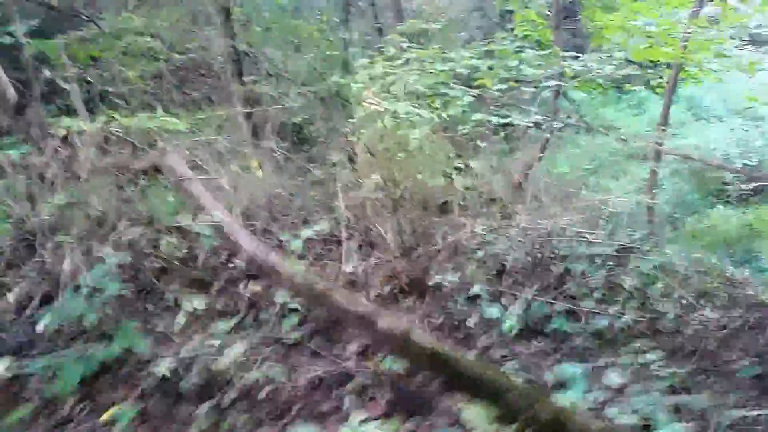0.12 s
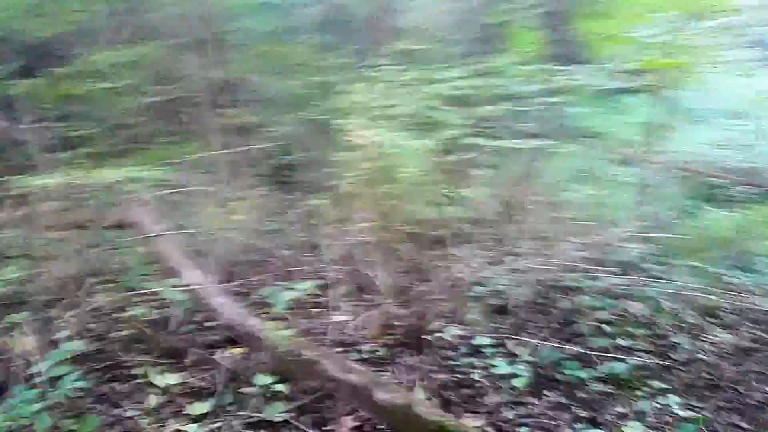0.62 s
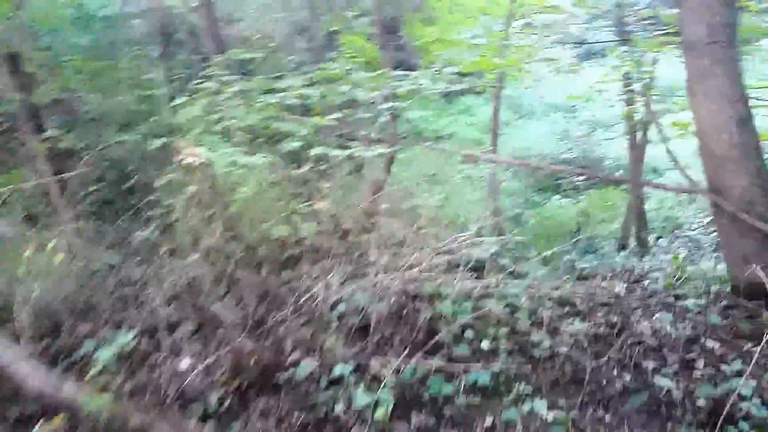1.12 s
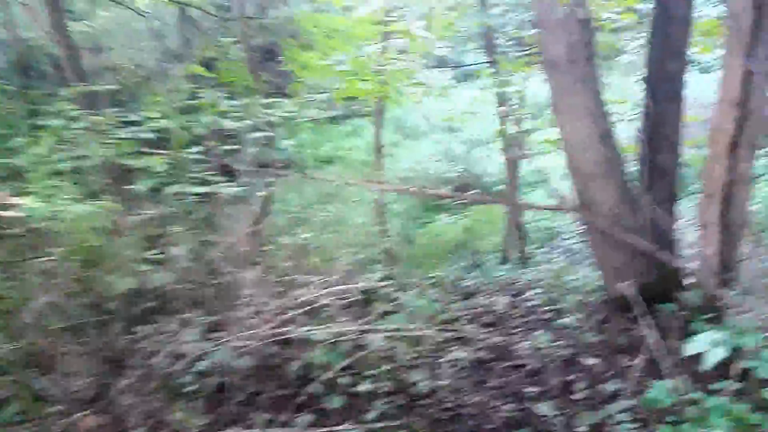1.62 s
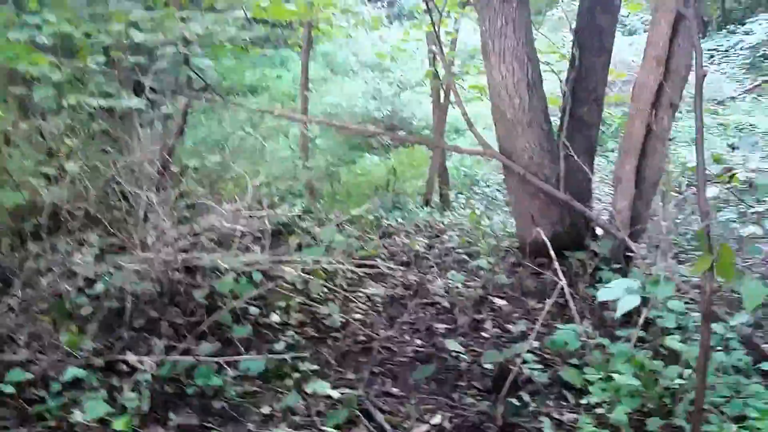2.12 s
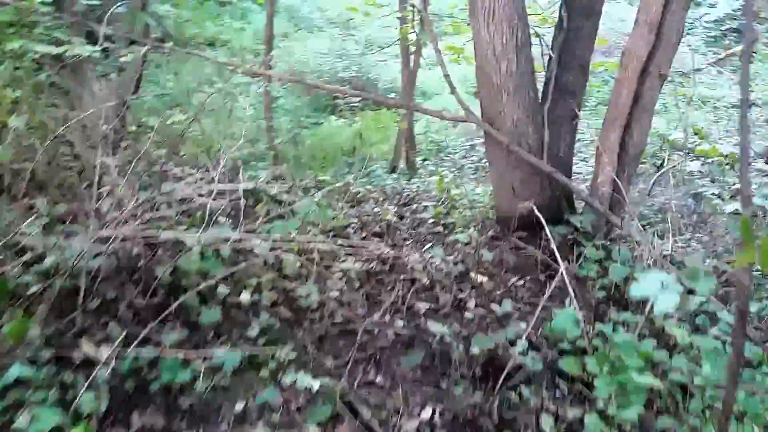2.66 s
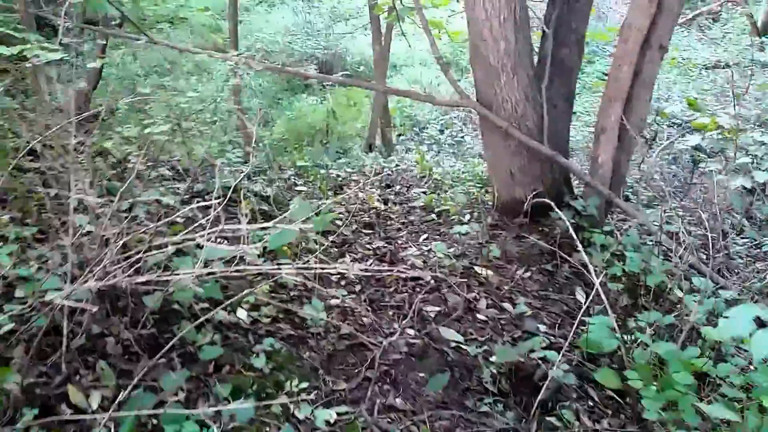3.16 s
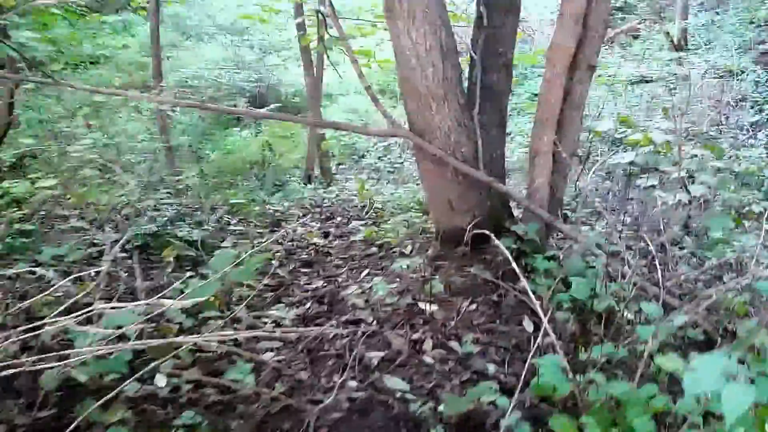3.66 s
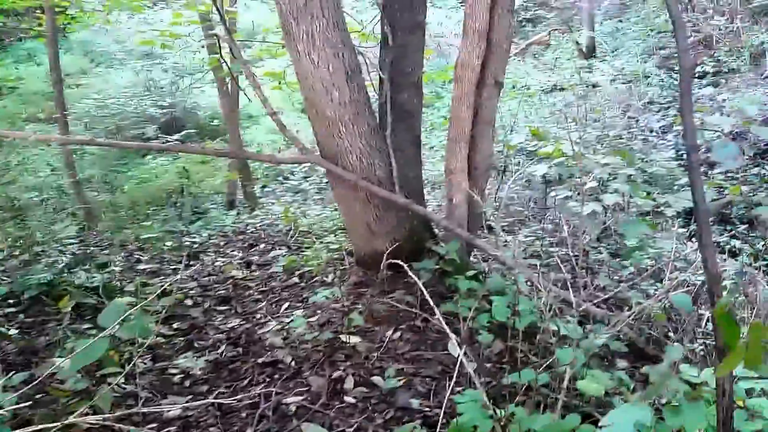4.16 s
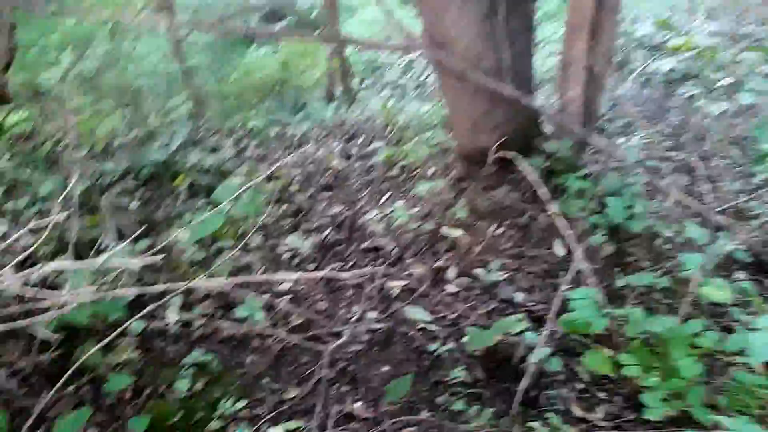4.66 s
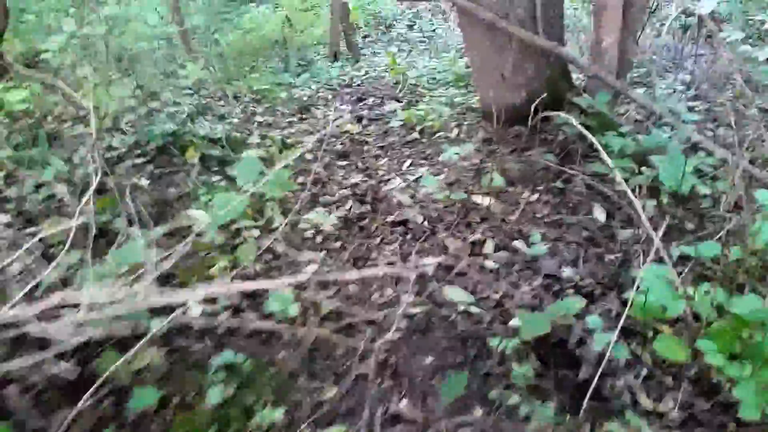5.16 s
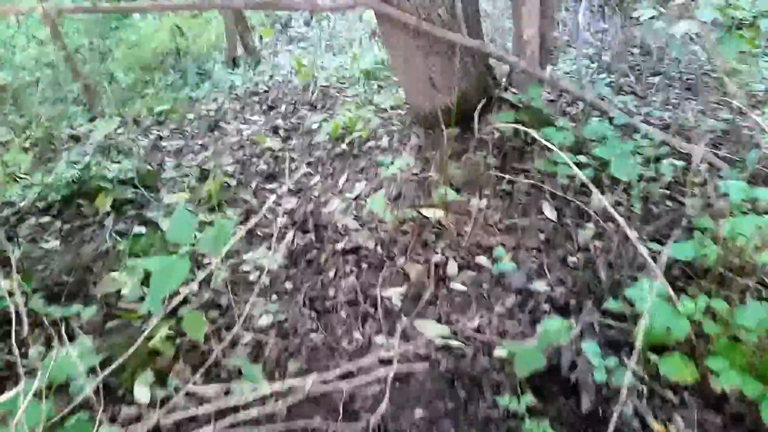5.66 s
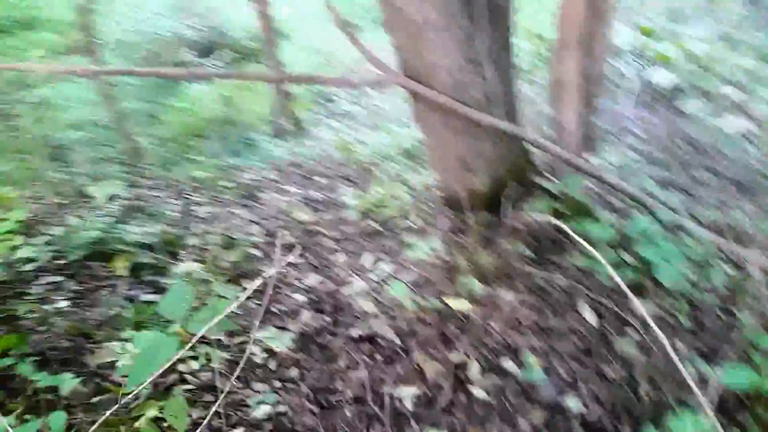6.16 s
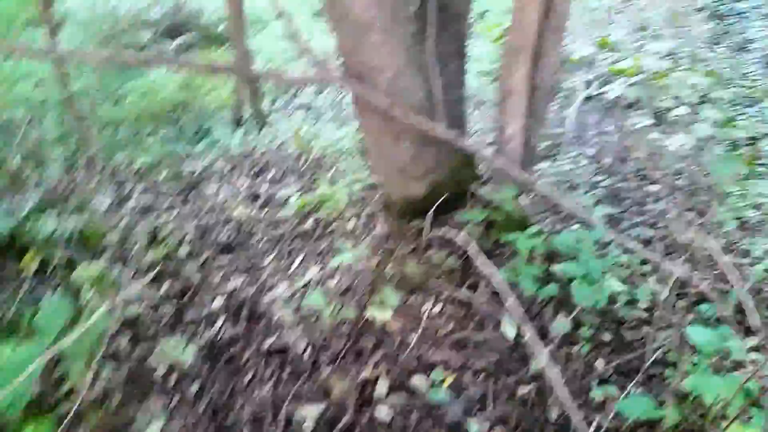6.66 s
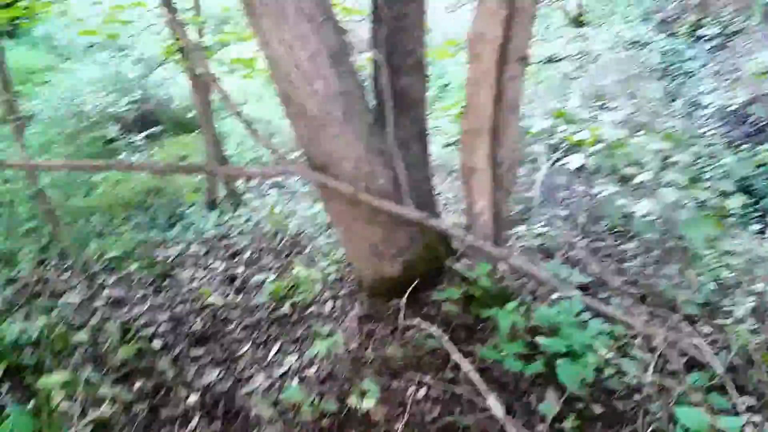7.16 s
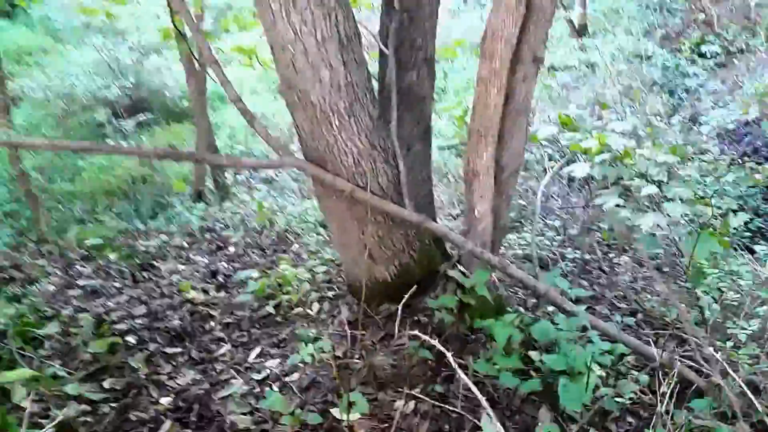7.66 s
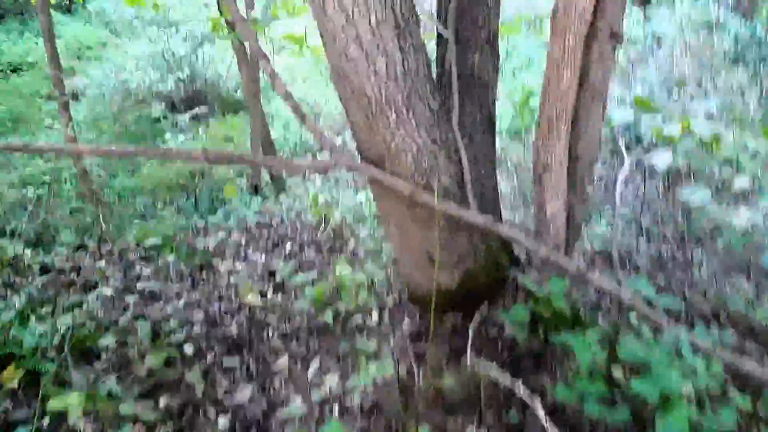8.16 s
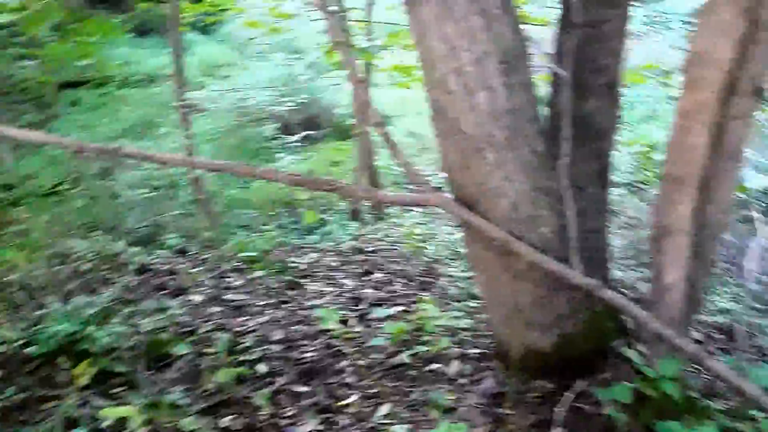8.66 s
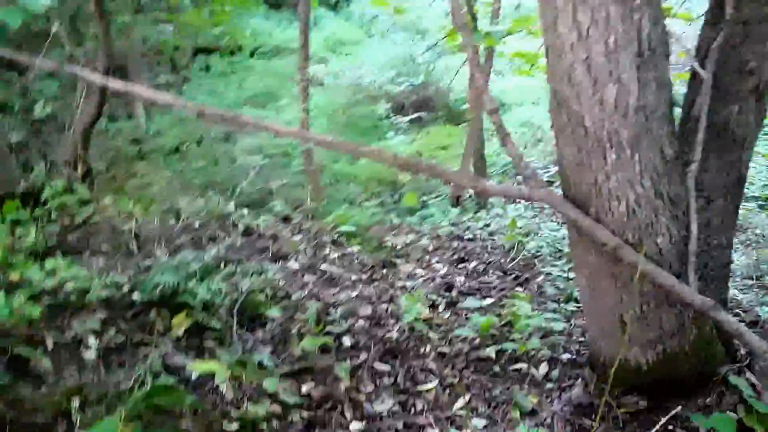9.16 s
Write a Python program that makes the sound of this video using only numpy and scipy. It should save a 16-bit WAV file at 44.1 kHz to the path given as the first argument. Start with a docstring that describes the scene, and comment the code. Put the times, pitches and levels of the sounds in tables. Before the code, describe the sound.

Woodland insects trill in a steady high chorus while twigs snap, leaves rustle and soft thumps knock close to the microphone, then a last burst of cracks.

```python
"""Twigs snap and fingers tap close to a small two-microphone recorder carried slowly through a wood of insects.
Clicks ring its ports and body; knocks swing the diaphragm, a finger rubs, leaves rustle in tiny cracks.
A near cricket's falling wing strokes stop early; a far chorus of trilling noise bands hisses on the left.
The left port favours 4-6 kHz, the right one 14 kHz; a low noise of the air lies under it all."""
import sys
import numpy as np
from scipy import signal
from scipy.fft import rfft, irfft, next_fast_len
from scipy.io import wavfile

SR = 44100
rng = np.random.default_rng(int(sys.argv[2]) if len(sys.argv) > 2 else 0)


def volts_from_db(level):
    """Convert decibel levels to linear amplitude ratios."""
    exponent = np.asarray(level, float) / 20
    return 10 ** exponent


def store_wav(level_fs):
    """Save 16-bit WAV to argv[1]."""
    pcm = np.round(np.clip(np.atleast_2d(level_fs), -1, 1) * 32767)
    wavfile.write(sys.argv[1], SR, pcm.T.astype(np.int16))


N = 410126
TIME_S = np.arange(N) / SR


def unit(x):
    """Scale so that the mean of the channels has rms 1."""
    return x / np.sqrt(np.mean(np.mean(np.atleast_2d(x), axis=0) ** 2) + 1e-24)


def in_time(rows):
    """Columns of a table as curves, one value a sample."""
    s, *columns = np.transpose(rows)
    return [np.interp(TIME_S, s, column) for column in columns]


def colour(x, spectrum, low_hz=0, high_hz=SR):
    """Give each channel its spectrum; the mean of both has rms 1 between low_hz and high_hz."""
    size = next_fast_len(N)
    hz = np.arange(size // 2 + 1) * SR / size + 1e-3   # the offset keeps the logarithm finite
    at, left, right = np.transpose(spectrum)
    gain_db = [np.interp(np.log(hz), np.log(at), side, left=-120, right=-120) for side in (left, right)]
    shaped = rfft(x, size) * volts_from_db(gain_db)
    inside = (hz > low_hz) & (hz < high_hz)
    power = 2 * np.sum(abs(shaped.mean(axis=0)[inside]) ** 2) / size / N
    return irfft(shaped, size)[:, :N] / np.sqrt(power)


def drift(rate_hz):
    """Slow chance of spread 1: noise through two equal low-pass poles, drawn every 40 samples."""
    r = np.exp(-80 * np.pi * rate_hz / SR)
    slow = signal.lfilter([1], [1, -2 * r, r * r], rng.standard_normal(N // 40 + 2002))[2000:]
    return np.interp(np.arange(N) / 40, np.arange(len(slow)), slow / slow.std())


def pair(alike):
    """Two white noises that share a part."""
    mid, side = rng.standard_normal((2, N))
    alike = np.clip(alike, 0, 1)
    return np.sqrt(1 + alike) * mid + np.sqrt(1 - alike) * side * [[1], [-1]]


def click_train(times, db):
    """One sample a click."""
    clicks = np.full(N, 1e-18)
    clicks[(np.asarray(times) * SR).astype(int)] = volts_from_db(db)
    return clicks


def ring(clicks, modes):
    """Clicks set every mode ringing as a decaying sine; neighbouring modes start with opposite signs."""
    out = 0
    for k, (hz, db, t60) in enumerate(modes):
        r = volts_from_db(-60 / (t60 * SR))
        w = 2 * np.pi * hz / SR
        strike = (-1) ** k * volts_from_db(db) * np.sin(w)
        out = out + signal.lfilter([0, strike], [1, -2 * r * np.cos(w), r * r], clicks)
    return out


def swells(s, levels_db, rise_s, fall_s):
    """Each row swells to its levels and dies away; overlapping rows add in power. One dB curve per level."""
    t = np.arange(0, N / SR, .001)
    late = t - np.array(s)[:, None]
    loss_db = 20 * np.maximum(-late / np.array(rise_s)[:, None], late / np.array(fall_s)[:, None])
    curves = []
    for db in levels_db:
        power = np.sum(volts_from_db(2 * (db[:, None] - loss_db)), axis=0)
        curves.append(np.interp(TIME_S, t, 10 * np.log10(power + 1e-12)))
    return curves


TICKS_PER_S = 30   # small ticks scattered through the rustle
# above the swish, per level column of a snap; full width of the chance about it
TICK_DB, TICK_RANGE_DB = (14, 15, 10, 8), 16


def ticks(swish_db):
    """Small snaps at random moments, stronger where the rustle around them is stronger."""
    chance = rng.random((int(TICKS_PER_S * N / SR), 5))
    s = chance[:, 0] * (N - 1) / SR
    crisp_db, mids_db, dull_db = swish_db[:, (s * SR).astype(int)]
    around_db = np.transpose([crisp_db, mids_db, dull_db, dull_db])
    db = around_db + TICK_DB + TICK_RANGE_DB * (chance[:, 1:] - .5)
    return np.column_stack([s, db])


# the clearest snaps, and taps on the casing, close to the microphones:
# (time [s], right port treble peak [dB], left port mids peak [dB],
# relative body level left [dB], relative body level right [dB])
SNAPS_AND_TAPS = [(0.0174, -36, -46, -60, -66), (0.0576, -38, -42, -69, -64), (0.079, -28, -48, -62, -65),
                  (0.1264, -22.5, -46, -53, -49), (0.1696, -33.5, -48, -61, -61),
                  (0.2666, -24, -25, -43, -52), (0.2813, -20, -40, -56, -57), (0.2871, -21, -34, -53, -57),
                  (0.294, -17, -42, -44, -61), (0.2992, -23, -45, -45, -61), (0.3196, -32, -40, -42, -34),
                  (0.3292, -25, -42, -24, -30), (0.336, -22, -43, -50, -51), (0.3433, -30, -42, -24, -43),
                  (0.353, -25.5, -43, -57, -58), (0.4589, -39, -51, -44, -34),
                  (0.5724, -43, -19, -8.5, -31), (0.585, -20, -42, -36, -19),
                  (0.6204, -40.5, -27, -28, -32), (0.6344, -46, -25, -19.5, -44),
                  (0.7954, -43.5, -20, -19, -40), (0.8026, -43.5, -24, -26, -33),
                  (0.813, -50, -22, -14, -32), (1.1321, -53, -75, -15, -39), (1.336, -36.5, -31, -36, -43),
                  (1.414, -37, -38, -27.5, -30), (1.4393, -13, -15, -26.5, -29),
                  (1.5871, -38, -34, -58.5, -65), (2.8932, -45, -34, -43, -49),
                  (3.1286, -53, -27.5, -59, -62), (3.3761, -58, -39, -46.5, -47),
                  (3.6412, -36, -30.5, -55, -52), (3.8488, -34, -35, -55, -63),
                  (3.8627, -33, -45, -64, -62), (3.9135, -34, -35, -50, -53),
                  (3.9303, -30.5, -38, -64, -62), (4.3162, -61, -72, -17, -32),
                  (4.4051, -63, -40.5, -43.5, -51), (5.1215, -56, -40.5, -48, -54),
                  (5.3607, -49, -37, -55, -51.5), (5.4178, -54, -31.5, -55, -73),
                  (5.5773, -55, -37, -58, -63), (5.7232, -52, -39, -50, -50.5),
                  (5.8888, -41, -60, -34, -37), (5.897, -54, -45, -40, -42), (6.0274, -60, -39, -45, -47),
                  (6.192, -47, -31, -51, -51), (6.2448, -49, -41, -50, -50),
                  (6.3955, -30, -31.5, -48.5, -47), (7.1835, -40, -49, -69, -73.5),
                  (7.6307, -43, -36, -60, -63.5), (7.7937, -49, -47, -47.5, -56),
                  (8.1027, -41, -51, -63, -58), (8.254, -54, -51, -41, -44), (8.4327, -32, -46, -46, -57),
                  (8.5098, -32, -31, -41, -39), (8.5426, -40, -27, -43, -41),
                  (8.5507, -26.5, -21, -30, -31), (8.5702, -23, -26, -28, -28), (8.597, -16, -21, -29, -29),
                  (8.6152, -7, -18, -20.5, -21), (8.6222, -24, -39, -37, -35),
                  (8.6741, -16, -16.5, -19.5, -21.5), (8.6884, -30, -22, -49, -48),
                  (8.7498, -8, -24.5, -27, -27), (8.7992, -38, -29.5, -48, -47),
                  (8.8279, -38, -34, -32.5, -33.5), (8.8404, -49, -50, -44, -45),
                  (8.8998, -48, -46, -48, -47), (8.9185, -33, -36, -62, -59)]
# what a snap or tap rings in either port and in the body: (frequency [Hz], relative level [dB], t60 [s])
RIGHT_PORT_TREBLE = [(12300, -5, 0.0019), (14444, 10, 0.002), (14620, 9, 0.0017)]
RIGHT_PORT_MIDS = [(3030, -7.5, 0.0038), (4460, -9, 0.0033), (6200, -9, 0.0026)]
LEFT_PORT_TREBLE = [(10800, -1.5, 0.0016), (13300, -1, .003), (15100, -15, .003)]
LEFT_PORT_MIDS = [(3510, 2, 0.002), (4260, 3.5, 0.0045), (5190, 8, 0.0038), (6530, 6, 0.0036)]
BODY_MODES = [(470, -2.5, 0.012), (768, -0.5, 0.0083), (1240, -1.5, 0.0057), (2630, -12, 0.0019)]
# mids this far under the body mark a fingertip tap, which is dull
SOFT_BELOW_DB, SOFT_CUT_HZ = -33, 1300


def snaps_and_taps(swish_db, treble_leak_db=-15, mids_leak_db=-22, splinter_db=-27, splinter_s=0.023,
                   softness=0.05):
    """A click rings ports and body; a crackle follows it and dies by 60 dB in splinter_s; taps are dull."""
    s, treble_db, mids_db, left_db, right_db = np.transpose([*SNAPS_AND_TAPS, *ticks(swish_db)])
    fade = volts_from_db(-60 / (splinter_s * SR))
    crackle = volts_from_db(splinter_db) * rng.standard_normal((2, N)) * volts_from_db(3 * drift(300))

    def port(db, ear, modes, edges_hz):
        """The click through one port resonance; a lone click peaks at its own height."""
        cut = signal.butter(4, edges_hz, "band", fs=SR, output="sos")
        clicks = click_train(s, db)
        burst = clicks + signal.lfilter([0, 1], [1, -fade], clicks) * crackle[ear]
        height = abs(signal.sosfilt(cut, ring(np.eye(1, 400)[0], modes))).max()
        return signal.sosfilt(cut, ring(burst, modes)) / height

    left = port(treble_db + treble_leak_db, 0, LEFT_PORT_TREBLE, [9000, 16500])
    left = left + port(mids_db, 0, LEFT_PORT_MIDS, [2000, 8500])
    right = port(treble_db, 1, RIGHT_PORT_TREBLE, [10500, 16500])
    right = right + port(mids_db + mids_leak_db, 1, RIGHT_PORT_MIDS, [2000, 8500])
    # a blow poor in mids is a soft contact and leaves the upper body modes quiet; each blow lands elsewhere
    tilt_db = softness * np.clip(mids_db - left_db, -45, 10)
    spot_db = rng.normal(0, 2, (len(s), len(BODY_MODES)))

    def struck(kind, side_db):
        """The body modes rung by one kind of blow."""
        out = 0
        for k, mode in enumerate(BODY_MODES):
            blow_db = side_db - 6.5 + k * k * tilt_db + spot_db[:, k]
            out = out + ring(click_train(s[kind], blow_db[kind]), [mode])
        return out

    soft = mids_db - left_db < SOFT_BELOW_DB
    hard = np.array([struck(~soft, db) for db in (left_db, right_db)])
    tap = np.array([struck(soft, db) for db in (left_db, right_db)])
    dull = signal.butter(4, SOFT_CUT_HZ, fs=SR, output="sos")
    body = hard + signal.sosfilt(dull, tap)
    return np.array([left, right]) - signal.lfilter([.3], [1, -.7], body)


# knocks on casing and ground, at the microphones:
# (time [s], left push level [dB], right push level [dB], mean push frequency [Hz], swings [count])
KNOCK_BLOWS = [(.319, -24, -39, 60, 2.15), (0.342, -30, -44, 150, 0.79), (.42, -28, -43, 50, 0.81),
               (.454, -27.5, -40, 226, 1.05), (0.554, -17.5, -41, 169, 0.89), (.572, -24, -47, 200, 1.3),
               (0.585, -45, -24, 110, 0.96), (0.6163, -14.5, -39, 132, 1.7), (0.667, -27, -43, 130, 0.99),
               (0.803, -5, -34, 87.6, 1.16), (0.8141, -9.5, -36, 71.9, 0.88),
               (1.1315, -23.5, -29, 259, 1.04), (1.441, -47, -46, 131, 1.3), (1.962, -41, -70, 123, 2.2),
               (2.007, -38, -68, 124, 1.14), (4.3152, -27, -37, 273.5, 1.1), (5.888, -40, -41, 148, 1.24),
               (5.898, -46, -44, 93, 3.6), (6.27, -51, -48, 100, 1.5), (8.573, -38, -37, 122, 1),
               (8.617, -48, -48, 150, 1.5), (8.671, -40, -39, 250, 1.1), (8.752, -45, -41.5, 133, 2.2)]
# the casing's hum: (frequency [Hz], relative level [dB], t60 [s])
CASING_MODES = [(250, -4, 0.5), (138, 3, .05), (460, 3, 0.03)]
REBOUND_S = .02   # a knock this soon after another pushes the other way


def knocks(slowing=0.92, skew=0.44, hum_db=-11, sharp=1.3):
    """A soft push swings the diaphragm, ever slower; knocks stronger on the left set the casing humming."""
    out, direction, last_s = np.zeros((2, N)), 1, -1
    for s, left_db, right_db, hz, swings in KNOCK_BLOWS:
        direction = -direction if s - last_s < REBOUND_S else 1
        last_s = s
        u = np.linspace(0, 1, int(swings * SR / hz))
        envelope = np.sin(np.pi * u ** skew) ** .5
        push = direction * np.sin(2 * np.pi * swings * u ** slowing) * envelope
        at = round(s * SR)
        out[:, at:at + len(push)] += push / abs(push).max() * volts_from_db(np.array([[left_db], [right_db]]))
    s, left_db, right_db, hz = np.transpose([k[:4] for k in KNOCK_BLOWS if k[1] > k[2] + 3])
    sharp_db = sharp * 20 * np.log10(hz / CASING_MODES[0][0])   # quicker pushes hum more
    hum = ring(click_train(s + 1 / hz, left_db + hum_db + sharp_db), CASING_MODES)
    pushes = signal.sosfilt(signal.butter(2, SOFT_CUT_HZ, fs=SR, output="sos"), out)
    return pushes + hum * volts_from_db(np.array([[0], [-20.5]]))


# a finger slips by the left port, touching the recorder:
# (time [s], low drag level [dB], hiss level [dB], time to rise by 20 dB [s], time to die by 20 dB [s])
FINGER_RUBS = [(.2, -63.5, -88, 0.4, 0.7), (.33, -46, -58, 0.03, 0.11), (0.459, -45.5, -56, 0.09, 0.06),
               (.585, -52, -41, 0.06, 0.08), (.63, -32.5, -44, 0.0473, 0.07), (0.691, -44, -52, 0.12, 0.05),
               (.75, -49, -75, 0.02, 0.09), (.797, -38, -28, .002, .025), (.805, -37, -25, .012, .013),
               (.813, -37, -33, .012, .003), (0.869, -46, -72.5, .08, 0.17)]
# spectra of drag and hiss: (frequency [Hz], relative left level [dB per Hz], relative right level [dB per Hz])
DRAG_SPECTRUM = [(40, -10, -22), (150, 9, -23.5), (500, 1.5, -20.5), (1230, -7.5, -34),
                 (2560, -25.5, -31.5)]
HISS_SPECTRUM = [(1450, -2, -30.5), (2500, -4.5, -36), (4200, 8.5, -41.5), (5500, -7, -44),
                 (6930, -10, -46), (8950, -28.5, -55.5), (11450, -23.5, -59), (14000, -18, -44),
                 (16000, -35.5, -46.5)]


def finger():
    """Skin sticks and slips: lumpy low drag and a more even hiss, strongest in the left port."""
    s, *levels_db, rise_s, fall_s = np.transpose(FINGER_RUBS)
    drag_db, hiss_db = swells(s, levels_db, rise_s, fall_s)
    drag = colour(pair(0.14) * volts_from_db(3.6 * drift(51)), DRAG_SPECTRUM)
    hiss = colour(pair(0) * volts_from_db(2 * drift(120)), HISS_SPECTRUM)
    return volts_from_db(drag_db) * drag + volts_from_db(hiss_db) * hiss


# leaves and clothing near the microphones, one swish a row:
# (time [s], crisp treble level [dB], mids level [dB], dull body level [dB], time to die by 20 dB [s])
LEAF_SWISHES = [(.075, -68, -66, -75.5, 0.8), (.15, -63, -62, -69.5, 0.4), (0.201, -51, -55, -65, 0.01),
                (.294, -50.5, -52.5, -63.5, 0.11), (.339, -56, -64, -60, 0.11),
                (0.453, -59, -62, -56, 0.28), (.54, -61, -59, -63, 0.26), (0.628, -47.5, -42.5, -48, 0.13),
                (.765, -61, -61.5, -63, .1), (.9, -76, -60.5, -72, 1.5), (1.263, -60, -55.5, -63, 0.34),
                (1.35, -56, -57, -63, .15), (1.395, -54, -54, -60.5, .09), (1.447, -58, -59, -67, 0.4),
                (1.7, -70.5, -58, -73, 0.9), (2.918, -65, -61, -69.5, 0.74), (3.44, -72, -66, -71.5, 0.6),
                (3.652, -57, -56, -64, 0.21), (3.76, -61, -62, -72, 0.26), (3.856, -57, -60, -70, 0.1),
                (3.921, -63, -58, -71, 0.44), (4.45, -78.5, -67.5, -78, 1.9),
                (5.472, -70.5, -60.5, -74.5, 0.63), (5.732, -64.5, -60.5, -71, 0.21),
                (5.905, -67, -67, -59.5, 0.16), (6.08, -77, -72, -71, 0.84),
                (6.246, -59.5, -61, -64.5, 0.28), (6.4, -61, -72, -70, .07), (7.174, -66, -61.5, -76, 0.15),
                (7.348, -73, -72, -80, 0.6), (7.7, -70.5, -65.5, -74, 0.68), (8.1, -73.5, -75, -73.5, 0.43),
                (8.281, -68, -68, -72.5, 0.37), (8.517, -47, -47.5, -55.5, 0.2664),
                (8.61, -47.5, -48, -54, 0.12), (8.683, -45, -44.5, -56, .045),
                (8.757, -48, -52.5, -59, .04), (8.8, -57, -59, -68, .12), (8.899, -61, -59.5, -67.5, .1)]
SWISH_RISE = 0.34   # share of the dying time
REST_DB = (-92, -85, -80)   # crisp, mid and dull rustle between the swishes


def swishes():
    """Crisp, mid and dull level of the rustle as swishes swell and die away, never below rest."""
    s, *levels_db, fall_s = np.transpose(LEAF_SWISHES)
    return np.maximum(swells(s, levels_db, SWISH_RISE * fall_s, fall_s), np.array(REST_DB)[:, None])


# rustle through the ports: (frequency [Hz], relative left level [dB per Hz], relative right level [dB per Hz])
CRISP_SPECTRUM = [(6500, -50, -46), (8670, -39, -39.5), (10000, -33, -31.5), (11940, -15, -9.5),
                  (14240, -18, 2.5), (15300, -5, -3.5), (16200, -17, -3)]
MIDS_SPECTRUM = [(1430, -22.5, -16), (2380, -18, -24.5), (2990, -8.5, -17.5), (4300, 0.5, -15.5),
                 (5460, 4.5, -25), (6570, -3, -28), (7000, -4.5, -20), (8420, -27.5, -40)]
DULL_SPECTRUM = [(60, -15, -13.5), (250, -2.5, 0), (501, 4, 0.5), (900, -2.5, -3), (1410, -5.5, -9.5),
                 (2190, -12.5, -15), (3990, -18.5, -20)]


def rustle(swish_db, grains_per_s=2700.0, spread_db=3.0, smooth=0.34):
    """Dense tiny cracks, coming in clumps, over a smooth swish; a duller body below."""
    crisp_db, mids_db, dull_db = swish_db
    clumps = volts_from_db(6.5 * drift(30))
    born = rng.random(N) < grains_per_s * clumps / SR
    height = volts_from_db(spread_db * np.minimum(rng.exponential(1, N), 5))
    cracks = unit(born * height * rng.choice([-1, 1], N))
    grains = np.array([np.roll(cracks, 5), cracks]) + smooth * pair(0)   # the ports lie a few cm apart
    dull = colour(pair(.5) * volts_from_db(3 * drift(40)) + .4 * grains, DULL_SPECTRUM, 500, 2200)
    crisp = colour(grains, CRISP_SPECTRUM)
    mids = colour(grains + 0.64 * pair(0), MIDS_SPECTRUM)
    return volts_from_db(crisp_db) * crisp + volts_from_db(mids_db) * mids + volts_from_db(dull_db) * dull


# one near cricket, by the left microphone: (time [s], typical peak level [dB], middle pitch [Hz])
NEAR_CRICKET = [(0, -36.5, 5414), (.4, -34.5, 5364), (.55, -38.5, 5330), (.7, -42.5, 5156),
                (.83, -38, 5240), (.97, -40.5, 5220), (1.1, -34.5, 5250), (1.65, -34.5, 5244),
                (2.1, -45, 5180), (2.55, -50, 5250), (2.75, -61, 5160)]
CRICKET_RIGHT_DB, CRICKET_OVERTONE_DB = -36, -47   # right port against left; octave against fundamental
FRESH_PER_S, TIRED_PER_S, TIRING_S = 68, 56.6, (1.65, 1.95)   # wing strokes; it slows down as it fades


def cricket(fall_hz=723.0, duty=0.51, uneven_db=0.5):
    """Each wing stroke is a short tone that falls in pitch as the wing's file runs out."""
    peak_db, hz = in_time(NEAR_CRICKET)
    turn = .45 + np.cumsum(np.interp(TIME_S, TIRING_S, [FRESH_PER_S, TIRED_PER_S])) / SR
    stroke = np.clip((turn % 1 - .5) / duty, -.5, .5)
    chance = rng.standard_normal((int(turn[-1]) + 1, 2))[turn.astype(int)]   # pitch and level of each stroke
    phase = 2 * np.pi * np.cumsum(hz - fall_hz * stroke + 40 * chance[:, 0]) / SR
    tone = np.sin(phase) + volts_from_db(CRICKET_OVERTONE_DB) * np.sin(2 * phase)
    level_db = peak_db + uneven_db * chance[:, 1] + 0.82 * drift(150)
    singing = TIME_S < NEAR_CRICKET[-1][0]
    near = np.cos(np.pi * stroke) * volts_from_db(level_db) * tone * singing
    return np.array([near, near * volts_from_db(CRICKET_RIGHT_DB)])


# far singers through the ports: (frequency [Hz], relative left level [dB per Hz],
# relative right level [dB per Hz])
CHORUS_SPECTRUM = [(2400, -47, -65), (3030, -20.5, -28), (3562, -10, -33.5), (4254, 3, -36), (5000, 1, -39),
                   (5480, 2.5, -20), (5630, -6.5, -36), (6530, -6.5, -32.5), (7480, -28, -47),
                   (7930, -41.5, -42), (8340, -63, -47.5)]


def chorus(level_db, depth=0.13, waver_db=0.76):
    """Groups of far singers, each in its own pitch band with its own trill rate and swell."""
    edges, groups = np.geomspace(2200, 9000, 9), 0
    white = rng.standard_normal((2, 2, N))
    for k, (low, high) in enumerate(zip(edges, edges[1:])):
        trill = 1 + depth * np.sin(2 * np.pi * rng.uniform(45, 85) * TIME_S + 3 * drift(2.36))
        band = signal.sosfilt(signal.butter(2, [low, high], "band", fs=SR, output="sos"), white[k % 2])
        groups = groups + band * trill * volts_from_db(waver_db * drift(3.7))
    return volts_from_db(level_db) * colour(groups, CHORUS_SPECTRUM, 3500, 4600)


# air all around: (frequency [Hz], relative left level [dB per Hz], relative right level [dB per Hz])
AIR_SPECTRUM = [(32, 10.5, -0.5), (100, 0, 2), (250, -6, -6), (474, -12.5, -13.5), (874, -30, -33),
                (1430, -34, -32.5), (2130, -27, -30.5), (8800, -58, -50), (10600, -46, -40.5),
                (12800, -30.5, -46), (14000, -31, -51), (16200, -25.5, -30.5)]
AIR_LIKENESS = 0.2   # how far the two ports hear the same noise


def air(level_db):
    """The wood's air: mostly low noise that wavers slowly, partly shared by the ports."""
    noise = volts_from_db(level_db + 1.5 * drift(6)) * colour(pair(AIR_LIKENESS), AIR_SPECTRUM, 40, 400)
    # the air's noise thins out below about 50 Hz
    return signal.sosfilt(signal.butter(2, 50, "high", fs=SR, output="sos"), noise)


# the wood around the recorder: (time [s], far chorus level [dB], low air level [dB])
WOOD_LEVELS = [(0.0, -58.5, -60), (0.49, -57, -55), (0.93, -58, -60.5), (1.53, -56, -60),
               (2.28, -60.5, -65), (2.9, -58.5, -61.5), (3.37, -60.5, -66.5), (3.75, -59, -64.5),
               (4.84, -61, -65), (5.54, -59.5, -64.5), (6.35, -60, -64.5), (6.89, -62.5, -67),
               (7.7, -60, -63), (8.31, -61.5, -65), (9.01, -62, -67), (9.3, -65, -69)]


def scene():
    """All sources, as the two ports pick them up."""
    chorus_db, air_db = in_time(WOOD_LEVELS)
    swish_db = swishes()
    close = snaps_and_taps(swish_db) + knocks() + finger()
    return close + rustle(swish_db) + cricket() + chorus(chorus_db) + air(air_db)


def top_cut(x):
    """Nothing passes above the cut-off."""
    return signal.sosfilt(signal.butter(12, 16970, fs=SR, output="sos"), x)


def record(dry):
    """The recorder's first-order high-pass cuts the lowest bass."""
    mix = signal.sosfilt(signal.butter(1, 22, "high", fs=SR, output="sos"), dry)
    return top_cut(mix)


dry = scene()
out = record(dry)
store_wav(out)
```